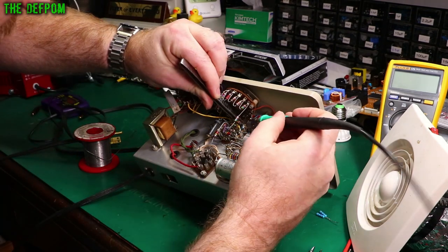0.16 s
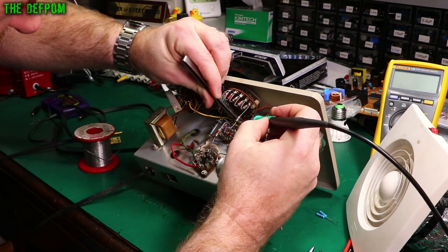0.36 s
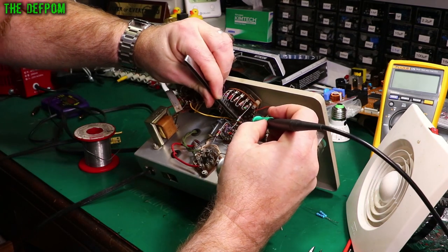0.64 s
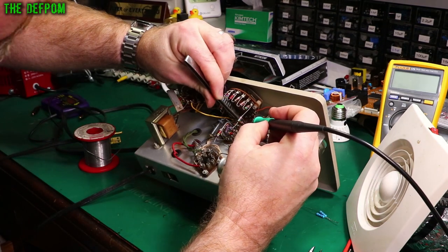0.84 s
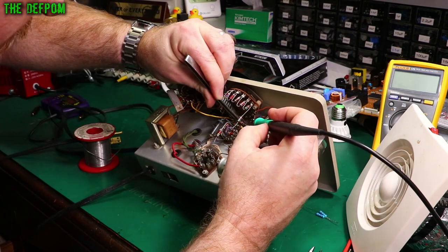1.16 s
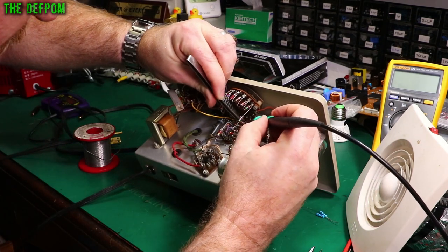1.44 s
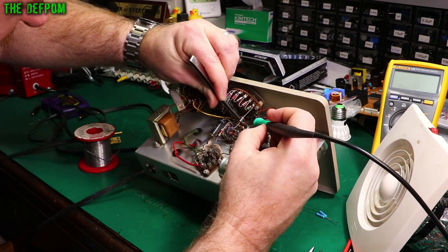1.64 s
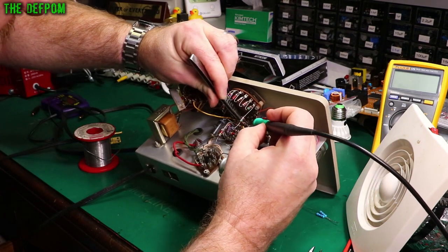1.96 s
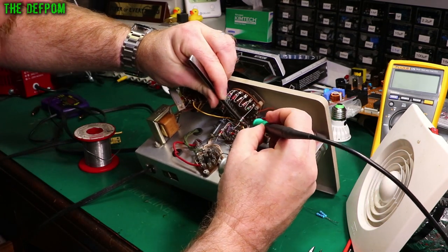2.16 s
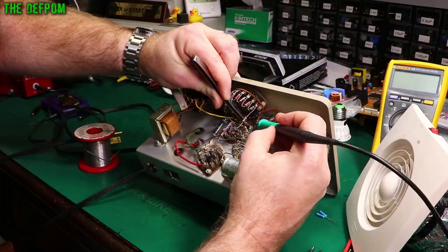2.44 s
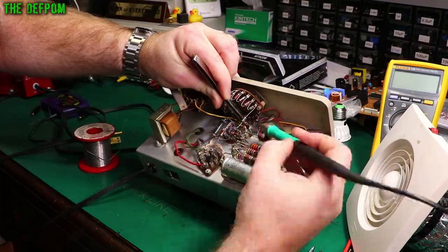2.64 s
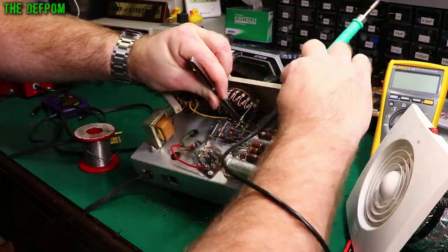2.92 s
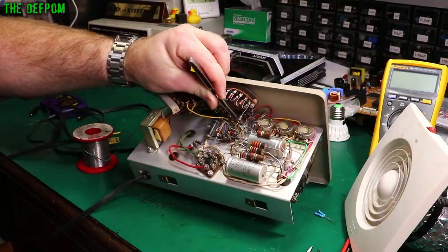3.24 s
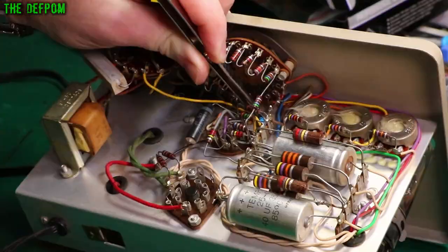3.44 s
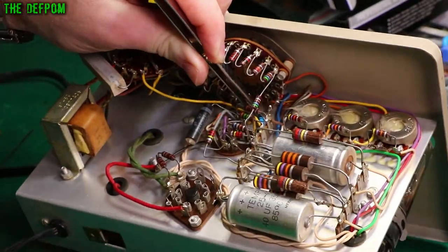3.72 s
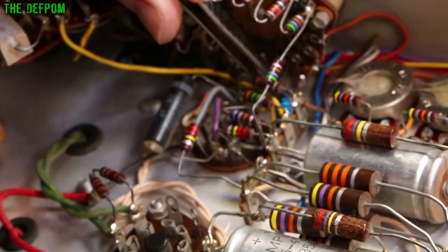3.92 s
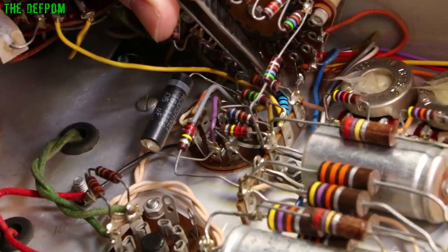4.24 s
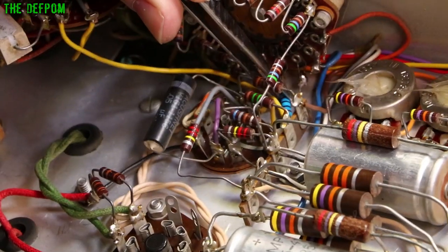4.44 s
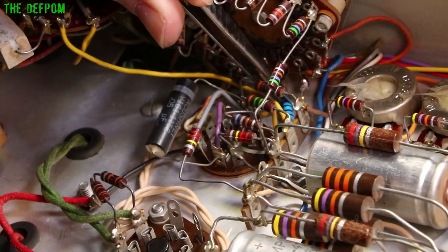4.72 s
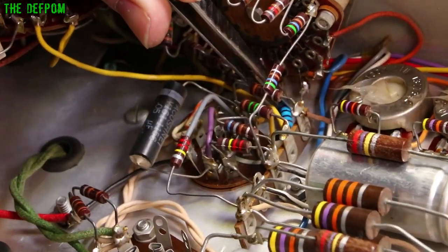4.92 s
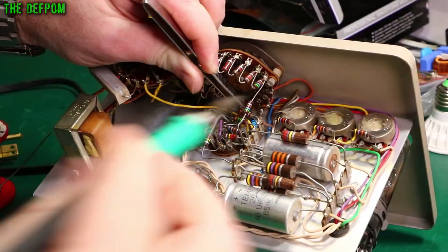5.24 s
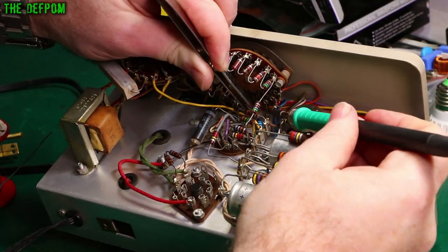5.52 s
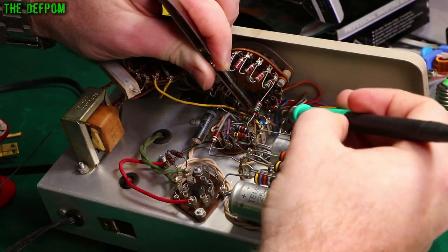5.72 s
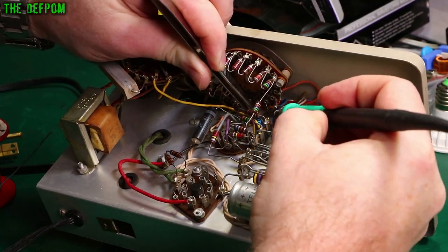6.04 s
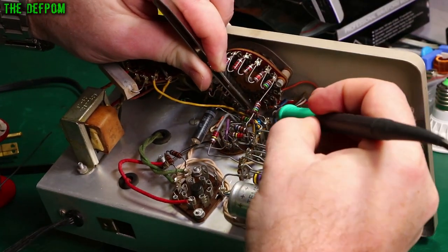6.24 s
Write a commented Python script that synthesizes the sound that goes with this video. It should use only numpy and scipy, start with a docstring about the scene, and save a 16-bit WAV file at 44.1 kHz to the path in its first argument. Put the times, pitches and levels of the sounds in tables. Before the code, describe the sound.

A small fan hisses steadily with a thin whistle, while light metal tools tick and a plastic switch snaps close by.

```python
"""Fume fan on an electronics bench

Air hisses and whistles through a fan's plastic grille over thin blade and motor tones; a low hum swells
once. A soldering iron and tweezers tick against the wiring. Midway a hand reaches to the camera: it
reflects more treble into the microphone, rubs and bumps the case, and snaps a small plastic switch."""
import sys
import numpy as np
from scipy import signal
from scipy.fft import rfft, irfft, next_fast_len
from scipy.io import wavfile
from scipy.ndimage import map_coordinates

SR = 44100
rng = np.random.default_rng(int(sys.argv[2]) if len(sys.argv) > 2 else 0)


def int16_out(signal):
    """Quantize to a 16-bit WAV file."""
    q = np.round(np.clip(np.atleast_2d(signal).T, -1, 1) * 32767)
    wavfile.write(sys.argv[1], SR, q.astype(np.int16))


N = 280917
TIME = np.arange(N) / SR
SPLIT = np.array([[.5], [-.5]])  # shares a left-right difference between the two channels


def amp(db):
    """Decibels to linear gain."""
    return 10 ** (np.asarray(db) / 20)


def unit(x):
    """x scaled to an rms of 1."""
    return x / np.sqrt(np.mean(x ** 2) + 1e-20)


def along(points, hz):
    """A curve through (f/Hz, value) points on a log frequency axis, read at hz."""
    freqs, values = np.transpose(points)
    return np.interp(np.log(hz + 1), np.log(freqs + 1), values)


def ramp(start_s, length_s):
    """A linear fade from 0 to 1."""
    return np.clip((TIME - start_s) / length_s, 0, 1)


def wobble(rate):
    """A smooth random curve with rate knots a second."""
    return map_coordinates(rng.standard_normal(int(N * rate / SR) + 4), [TIME * rate])


def filtered(x, response):
    """x through a filter given as gain against frequency."""
    size = next_fast_len(N + SR // 2)
    return irfft(rfft(x, size) * response(np.fft.rfftfreq(size, 1 / SR)), size)[..., :N]


def noise(colour_db):
    """Noise of rms 1 with a spectrum given in dB."""
    return unit(filtered(rng.standard_normal(N), lambda hz: amp(colour_db(hz))))


def pan(db):
    """Stereo gains that put the left channel db above the right."""
    return amp(SPLIT * db)


def add(track, start_s, sound):
    """Mix a sound into a track at start_s."""
    part = track[..., round(start_s * SR):][..., :sound.shape[-1]]
    part += sound[..., :part.shape[-1]]


def hum_swell(pitch_hz=280, waver_hz=11.6, level_db=-63.5):
    """A faint, unsteady low hum rises, holds and fades."""
    envelope = ramp(0.71, 0.16) * (1 - ramp(1.05, 0.16))
    phase = 2 * np.pi * np.cumsum(pitch_hz + waver_hz * wobble(40.3)) / SR
    return amp(level_db) * envelope * np.sqrt(2) * np.sin(phase)


def fan_tones(spread_rad=0.19):
    """Blade and motor tones waver in pitch in the uneven flow; higher ones sit wider in stereo."""
    # blade and motor tones: f/Hz, rms level/dB, line width/Hz
    tones = [(307, -72, 3), (600, -60, 3), (721, -70, 4), (749, -69.5, 1.5), (1044, -57, 6), (1200, -60, 2),
             (1410, -67, 5), (1911, -64, 2), (2874, -56.5, 3), (3000, -62, 1.5), (3134, -64, 10),
             (3473, -62, 3), (4457, -71, 4), (4748, -66, 4), (6860, -69, 6), (8398, -71, 14)]
    out = np.zeros((2, N))
    for hz, db, width in tones:
        phase = 2 * np.pi * np.cumsum(hz + .5 * width * wobble(4 * width)) / SR
        offset = spread_rad * np.clip((hz - 1000) / 4000, 0, 1) * np.array([[1], [-1]])
        out += amp(db) * np.sqrt(2) * np.sin(phase + offset)
    return out


def grille_whistle(pitch_hz=2591, drift_hz=8, jitter_hz=4, base_db=-53, swing_db=3, phase_rad=0.4):
    """Air sings over an edge of the grille, drifting in pitch and swelling at random up to a ceiling."""
    hz = pitch_hz + drift_hz * wobble(16) + jitter_hz * wobble(70)
    swells_db = swing_db * np.minimum(wobble(10), 1.6)
    firmer_db = 3 * ramp(4.2, 0.11)  # the whistle steps up a little and stays there
    phase = 2 * np.pi * np.cumsum(hz) / SR - phase_rad * SPLIT
    return amp(base_db + firmer_db + swells_db) * np.sqrt(2) * np.sin(phase)


def hiss_peaks_db(hz):
    """Peaks in the fan's hiss: housing resonances, plus treble ripple from nearby surfaces."""
    # resonances and ripple: f/Hz, width/Hz, lift/dB
    peaks = [(257.5, 28, 7), (297, 19, 9), (528, 72, 6.5), (706, 22, 7), (919.5, 89, 9), (1043, 124, 11),
             (1313, 70, 2.5), (1616, 117, 7), (2484, 210, 4.5), (2601, 33, 7), (2762, 210, 4.5),
             (3090, 67, 3), (3430, 150, 0.5), (4010, 250, 2.5), (4700, 160, -0.5), (5420, 200, 4.5),
             (6020, 190, 2), (7370, 140, 5), (10620, 910, 3), (12400, 530, 3)]
    return sum(db * .5 ** ((2 * (hz - centre) / width) ** 2) for centre, width, db in peaks)


def fan_air(direct_db=-39.0, diffuse_db=-44.0, flutter_db=0.55, left_lag_s=11e-6):
    """Turbulence rings the housing and reaches the right ear first; the room returns a smoother hiss."""
    # spectrum of the air straight from the fan: f/Hz, relative level/dB
    direct_colour = [(25, -30), (100, -22), (210, -18.5), (380, -11), (620, -8.5), (800, -7.5), (1200, 1),
                     (2000, 0), (3000, 3.5), (4500, -3.5), (8000, -4.5), (12500, -5.5), (14500, -7.5),
                     (16000, -14.5)]
    # spectrum of the room's diffuse hiss: f/Hz, relative level/dB
    diffuse_colour = [(25, -27), (230, -16.5), (550, -10.5), (850, -10.5), (1100, -18.5), (1450, -10.5),
                      (1660, -22), (1800, -5), (2180, -7), (2500, -1), (2780, -4), (3000, 1), (4750, -5),
                      (5400, -3.5), (6200, -3.5), (9300, -5), (12500, -2), (14500, -7), (15800, -7)]
    # stereo balance of the air: f/Hz, left minus right/dB
    balance = [(60, -1), (250, -1), (600, -0.9), (2500, -0.1), (5000, 0), (7500, -2.5), (10000, -2),
               (12500, -4.5), (15000, -3)]
    flutter = amp(direct_db + flutter_db * wobble(14))
    direct = flutter * noise(lambda hz: along(direct_colour, hz) + hiss_peaks_db(hz))
    direct = filtered(direct, lambda hz: np.exp(-2j * np.pi * hz * left_lag_s * SPLIT))
    diffuse = amp(diffuse_db) * noise(lambda hz: along(diffuse_colour, hz) + .15 * hiss_peaks_db(hz))
    wide = direct + np.array([diffuse, -diffuse])
    return filtered(wide, lambda hz: pan(along(balance, hz)))


def hand_reflection(arrive_s=3.12, leave_s=5.25, drift_off_s=1.5, gain_db=-41.0, side_db=4):
    """A hand throws fan hiss into the microphone as it arrives, creeps in, pulls back and drifts off."""
    # spectrum of the hiss off the hand: f/Hz, relative level/dB
    colour = [(1000, -17), (3000, -1), (4500, -20), (5300, -12), (5900, 6.5), (6400, 2), (6900, 7),
              (7800, 5.5), (8450, 7.5), (9500, 2.5), (12500, -4), (16000, -18)]
    # phase of the reflection across the microphone ports: f/Hz, left minus right/rad
    port_phase = [(3000, .2), (7400, 0.56), (8300, 2.25), (12500, 2.1)]
    creeping = ramp(arrive_s, 0.16) * (0.55 + 0.13 * (TIME - arrive_s))
    drifting = 0.39 * np.exp(-np.maximum(TIME - leave_s, 0) / drift_off_s)
    pulled_back = ramp(leave_s, 0.18)
    nearness = (1 - pulled_back) * creeping + pulled_back * drifting
    hiss = noise(lambda hz: along(colour, hz))
    stereo_hiss = filtered(hiss, lambda hz: np.exp(1j * along(port_phase, hz) * SPLIT))
    return amp(gain_db) * nearness * pan(side_db) * stereo_hiss


def nearby_echoes(x, strength, count=10):
    """Clutter within a metre returns weak early copies, different at each ear, that ripple the treble."""
    delays_s = rng.uniform(0.00048, 0.0054, (count, 2, 1))
    copies = lambda hz: sum(np.exp(-2j * np.pi * hz * delay) for delay in delays_s) / np.sqrt(count)
    return filtered(x, lambda hz: 1 + strength * np.clip(hz / 5000, 0, 1) ** 3 * copies(hz))


def finger_bumps(rise_cycles=0.4, side_db=2):
    """A fingertip gives the case a soft, dead thud that swells and dies within about two cycles."""
    # thuds on the case: t/s, level/dB, f/Hz
    bumps = [(3.439, -52, 150), (3.855, -47, 130), (4.792, -57, 95), (4.921, -52, 160), (4.972, -56, 55),
             (5.025, -50, 165), (5.126, -50, 135), (5.153, -46, 160), (5.206, -45, 250)]
    out, t = np.zeros(N), np.arange(SR // 8) / SR
    for start_s, db, hz in bumps:
        age = hz * t / rise_cycles
        envelope = (age * np.exp(1 - age)) ** 3
        add(out, start_s, amp(db) * envelope * np.sin(2 * np.pi * hz * t))
    return pan(side_db) * out


def ticks_and_knocks(width_octaves=0.33, grain_db=3):
    """Brief bands of gritty noise: light ticks, short rubs and the hollow knock of the switch."""
    # ticks, rubs and switch knocks: t/s, level/dB, length/s, centre f/Hz, left minus right/dB
    bursts = [(0.237, -37, .011, 8440, -2), (0.56, -39, 0.0074, 13000, -4), (2.42, -33, 0.006, 5900, 2),
              (2.42, -39, .008, 15000, -3), (2.907, -34, .005, 13000, -3), (2.901, -46.5, 0.014, 620, -2),
              (3.207, -37, .004, 15000, 0), (3.253, -42, .03, 11500, 2), (3.343, -39, .005, 1000, 2),
              (3.858, -44, .005, 380, 2), (3.861, -39, .005, 1100, -6), (3.882, -36, .012, 3400, 1),
              (3.884, -42, 0.039, 10900, 1), (4.22, -42, .04, 12500, 1), (4.973, -33, .003, 12000, 0),
              (5.072, -42, .03, 12000, 2), (5.132, -44, .015, 11000, 2), (5.207, -29, 0.0016, 11000, 2),
              (5.23, -47, 0.033, 4500, -6), (5.288, -35.5, 0.012, 11400, -5), (5.286, -40, .012, 2400, -2)]
    out, size = np.zeros((2, N)), SR // 4
    t = (np.arange(size) - size // 2) / SR
    hz = np.fft.rfftfreq(size, 1 / SR) + 1
    for peak_s, db, length_s, centre_hz, side_db in bursts:
        grit = rng.standard_normal((2, size)) * amp(grain_db * rng.standard_normal(size))
        band = np.exp(-.5 * (np.log2(hz / centre_hz) / width_octaves) ** 2)
        burst = unit(irfft(rfft(grit) * band, size))
        envelope = np.exp(-2 * (t / length_s) ** 2)
        add(out, peak_s + t[0], amp(db) * pan(side_db) * burst * envelope)
    return out


def switch_snaps(attack_s=50e-6, crack_hz=4600, crack_s=90e-6):
    """The switch snaps and rebounds: a one-cycle crack, then a few milliseconds of damped plastic ring."""
    # snaps and rebounds: t/s, gain/dB, hollow body/dB, sharp edge/dB, crack/dB, bass cut/Hz,
    # stereo phase/rad, left minus right/dB
    snaps = [(3.3395, -19.5, -13, 5.5, 16.5, 950, 1.95, -2), (3.3413, -28, 4, -8, -12, 1000, -0.5, -4),
             (3.8577, -17, -18, -16, 0.5, 230, 0.26, 0), (3.8603, -22, -6, -12, -12, 300, 0.5, 1),
             (4.9802, -9.5, 6, -2, 1, 370, 0.33, -0.5), (4.9813, -15.5, -6, 4, -18, 370, 4.5, -2)]
    # modes of the plastic case: f/Hz, level/dB, t60/s
    case_modes = [(556, -8.5, 0.0054), (920, -1.5, 0.0052), (1700, -7, 0.0059), (2200, -11, 0.0078),
                  (3320, 2, 0.0054), (3840, -1, 0.0057), (4640, -6.5, 0.011), (5230, -7.5, 0.0091),
                  (6900, -11, .005), (8340, -15.5, 0.0058), (10100, -4, 0.004), (11750, -8, 0.004),
                  (13200, -16, .003), (15000, -11, .004)]
    out, t = np.zeros((2, N)), np.arange(SR // 20) / SR
    for start_s, db, body_db, edge_db, crack_db, cut_hz, phase_rad, side_db in snaps:
        colour = [(1700, body_db), (3000, 0), (5000, 0), (8000, edge_db)]
        offset = phase_rad * SPLIT
        ring = np.zeros((2, t.size))
        for k, (hz, mode_db, t60) in enumerate(case_modes):
            decay = amp(mode_db + along(colour, hz) - 60 * t / t60)
            ring += (-1) ** k * decay * np.sin(2 * np.pi * hz * t + offset)
        ring *= 1 - np.exp(-t / attack_s)
        from_peak = t - 2 * crack_s
        pulse = amp(crack_db) * np.exp(-(from_peak / crack_s) ** 2)
        crack = pulse * np.sin(2 * np.pi * crack_hz * from_peak + offset)
        # so small a part radiates little bass
        bass_cut = signal.butter(2, cut_hz, "high", fs=SR, output="sos")
        add(out, start_s, amp(db) * pan(side_db) * signal.sosfilt(bass_cut, crack + ring))
    return out


def scene():
    """The fan's bed of hiss and tones, with close snaps, ticks and bumps on top."""
    hiss = nearby_echoes(fan_air() + hand_reflection(), strength=0.32)
    bed = hiss + fan_tones() + grille_whistle() + hum_swell()
    return bed + switch_snaps() + ticks_and_knocks() + finger_bumps()


def record(dry, top_hz=15870):
    """The camera's band limit cuts off the highest treble."""
    return filtered(dry, lambda hz: hz < top_hz)


dry = scene()
out = record(dry)
int16_out(out)
```